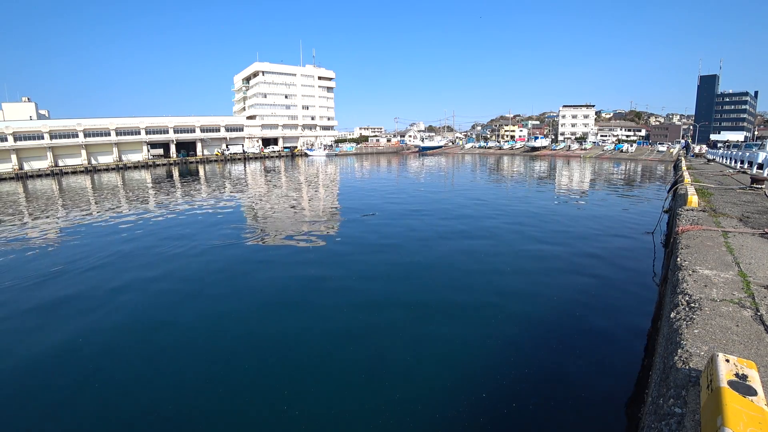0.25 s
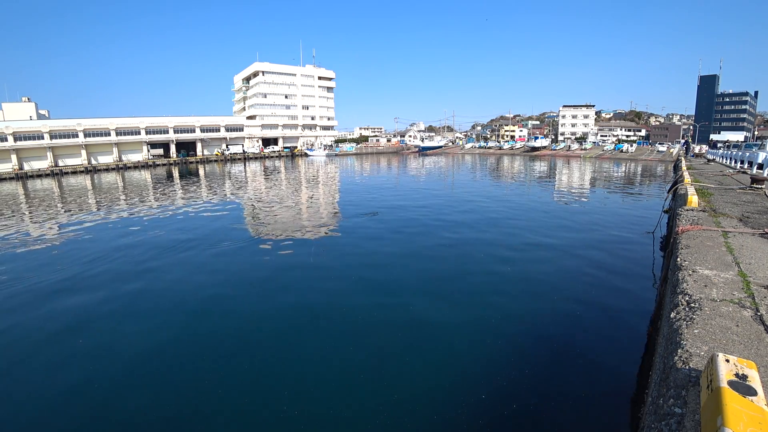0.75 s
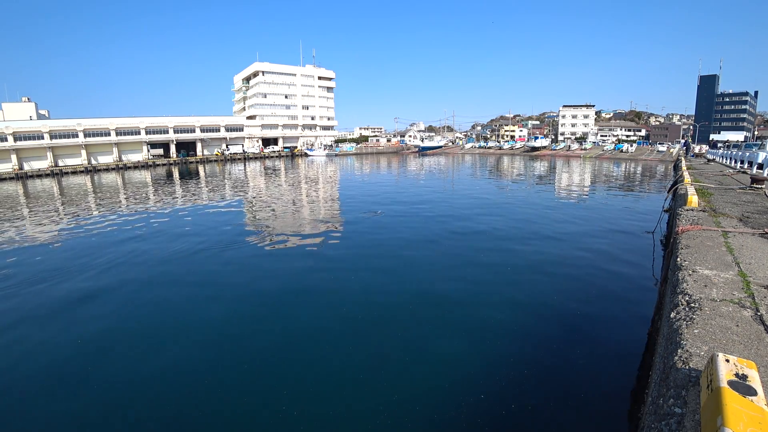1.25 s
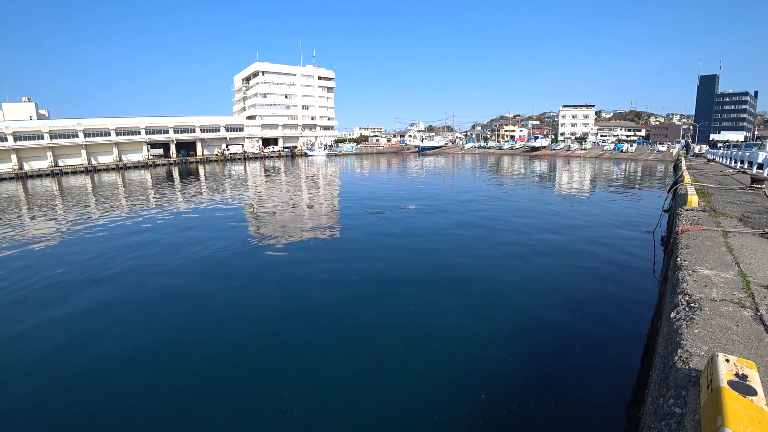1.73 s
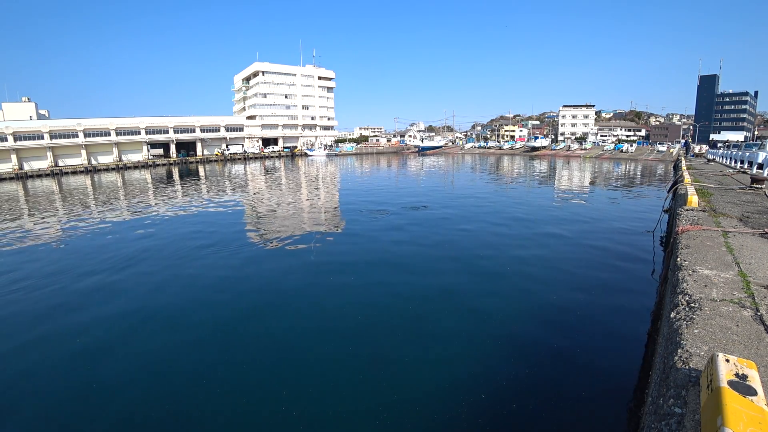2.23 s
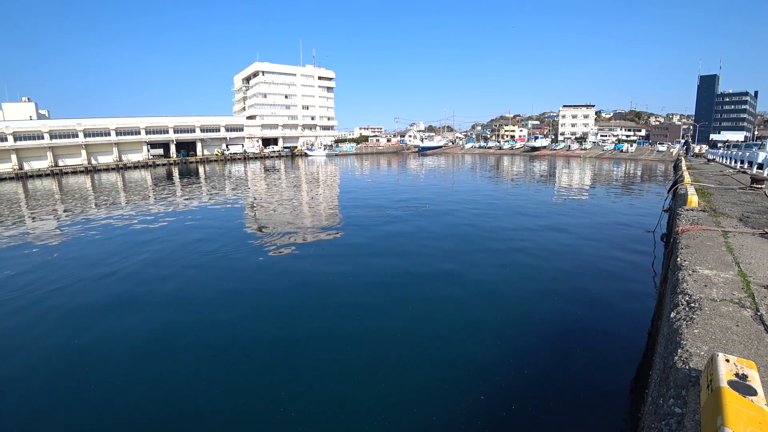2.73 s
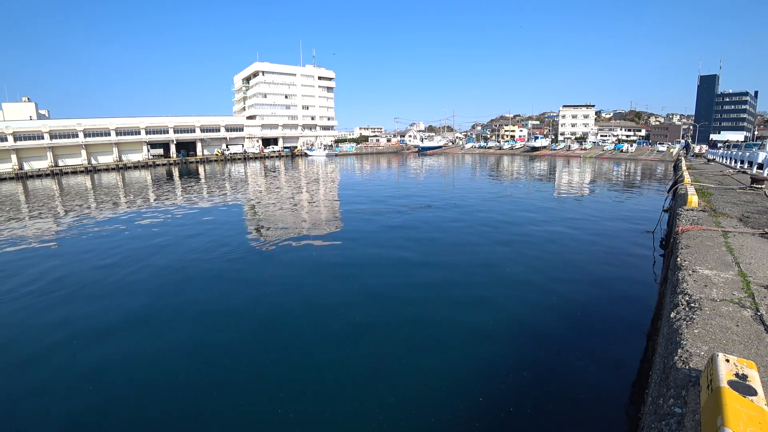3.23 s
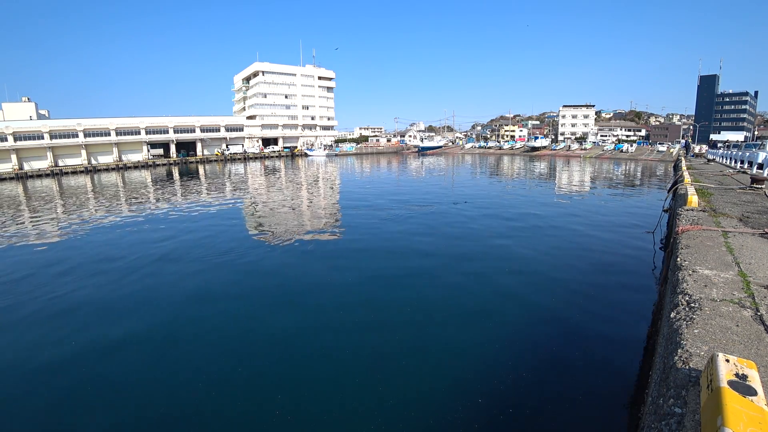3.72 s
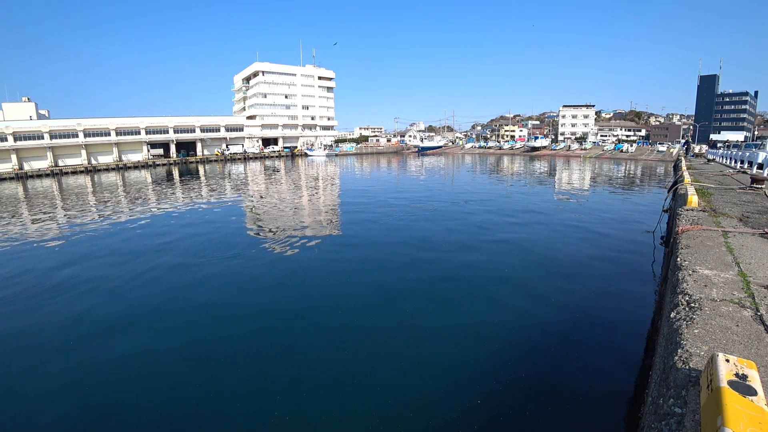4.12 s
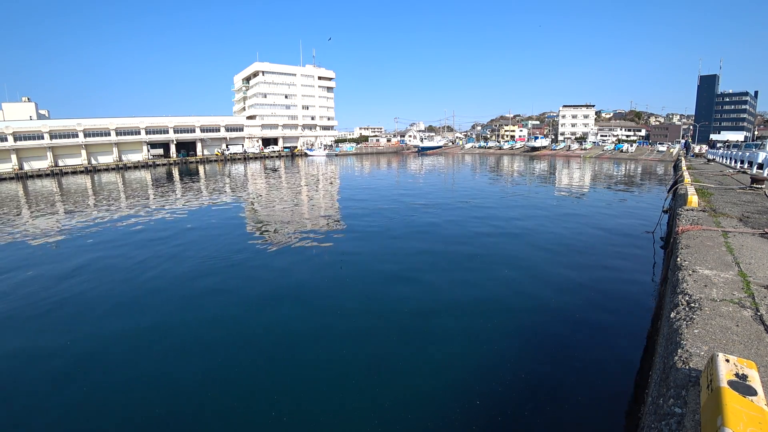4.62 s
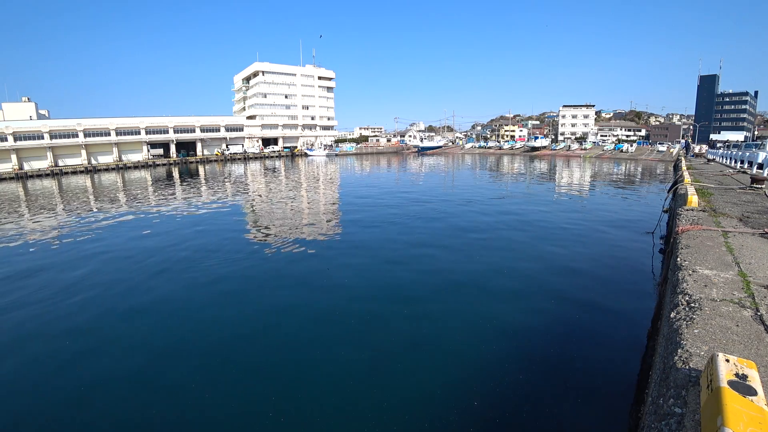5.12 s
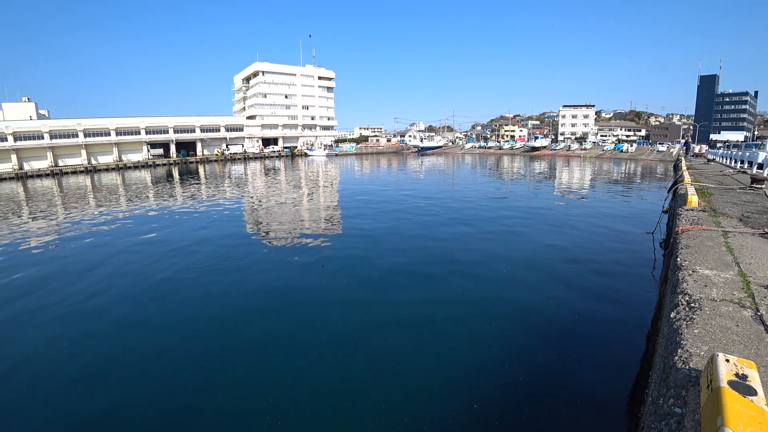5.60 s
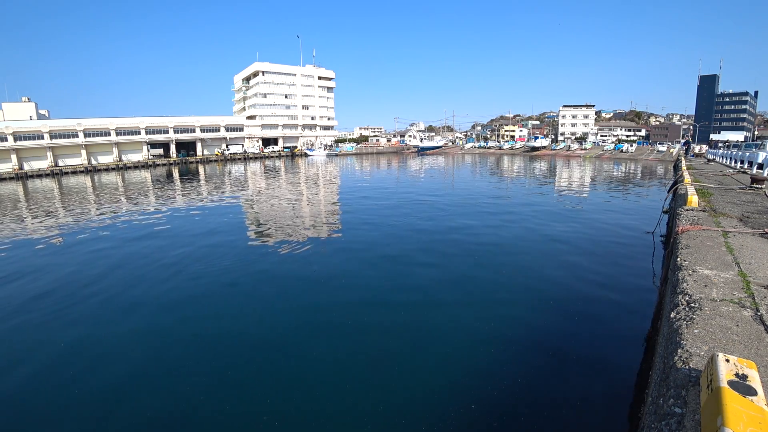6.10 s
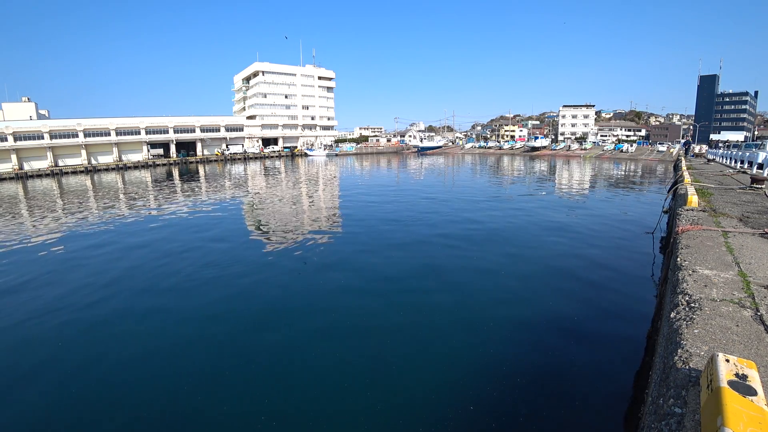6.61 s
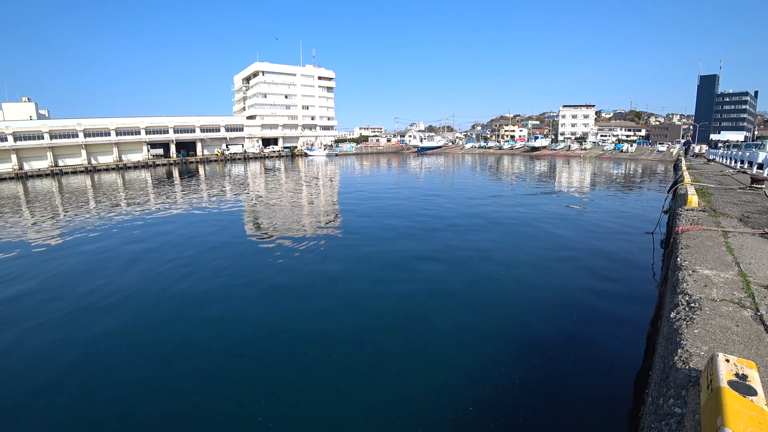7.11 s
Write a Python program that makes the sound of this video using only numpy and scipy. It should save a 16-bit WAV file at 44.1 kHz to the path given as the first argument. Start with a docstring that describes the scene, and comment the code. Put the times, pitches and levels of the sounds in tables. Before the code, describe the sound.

An open, calm harbour heard from the quay for a little over seven seconds. Throughout, a steady low hum of generator and pump, with a faint fan and barely audible thin electric whine, lies under soft, wide distant town and water noise that swells slowly. A small gritty scuff comes at 0.2 s. From 0.4 to 0.7 s a gust buffets the microphone, with a cluster of low fluttering thumps strongest near 0.6 s, uneven between left and right; another bump lands at 1.3 s. From 1.3 to 2 s a shoe scrapes and crunches on grit, close and central. A weaker puff passes around 2.3 s. Short scrapes follow at 3 s, faintly at 3.4 s, and at 4.6 s, with the hum exposed between them. From 6.1 s gritty footsteps return, with a light gust at 6.4 s, then busy crunching and clicking to the end.

```python
"""Calm harbour at the quay. Throughout: far town and water as shaped noise; generator, pump, fan and a thin
electric whine as wavering sine lines. 0.4-1.3 s: gusts, as rumbling noise and decaying pressure kicks, thump on
two microphone ports. From 0.2 s to 2 s, about 3 s and 4.6 s water laps and splashes at the quay: ringing drops,
noise-burst ticks, short sine bubbles. Weaker gusts near 2.3 s and 6.4 s; from 6 s the lapping is busier, to the
end."""
import sys
import numpy as np
from scipy import signal
from scipy.fft import rfft, irfft, next_fast_len
from scipy.io import wavfile
from scipy.ndimage import uniform_filter1d

SR = 44100
rng = np.random.default_rng(int(sys.argv[2]) if len(sys.argv) > 2 else 0)


def makeup_ratio(level_db):
    """Linear amplitude ratio for a level in decibels (20 dB per factor of ten)."""
    decades = np.asarray(level_db, float) / 20
    return 10 ** decades


def waveform_to_disk(signal):
    """Save audio, clipped to [-1, 1], as 16-bit WAV at the path in sys.argv[1]."""
    frames = np.transpose(np.atleast_2d(signal))
    scaled = np.clip(frames, -1, 1) * 32767
    samples = np.round(scaled).astype(np.int16)
    wavfile.write(sys.argv[1], SR, samples)


N = 324135


def columns(table):
    """Table rows as float columns."""
    return np.array(table, float).T


def level(x, rms_db):
    """Scale to an rms level."""
    return x * makeup_ratio(rms_db) / np.sqrt(np.mean(x ** 2))


def shape(table, hz):
    """Spectrum table in dB at given frequencies, interpolated over log frequency."""
    f, db = columns(table)
    return np.interp(np.log(np.maximum(hz, 1)), np.log(f), db)


def colour(x, db_of_hz):
    """Filter by a dB-over-frequency function."""
    n = next_fast_len(x.shape[-1])
    gain = makeup_ratio(db_of_hz(np.fft.rfftfreq(n, 1 / SR)))
    return irfft(rfft(x, n) * gain, n)[..., :x.shape[-1]]


def band_noise(low_hz, high_hz):
    """White noise through a band-pass."""
    sos = signal.butter(2, [low_hz, high_hz], "band", fs=SR, output="sos")
    return signal.sosfilt(sos, rng.standard_normal(N))


def walk(rate_hz):
    """Random levels held 1 / rate_hz and slewed twice; spread near 1."""
    k = int(SR / rate_hz)
    steps = np.repeat(rng.standard_normal(N // k + 1), k)
    return 1.12 * uniform_filter1d(uniform_filter1d(steps, k), k)[:N]


def swell(peak_s, db, rise_s, fall_s):
    """Gain climbing to a peak and dying away, straight in dB: 20 dB per rise_s or fall_s."""
    t = np.arange(N) / SR - peak_s
    return makeup_ratio(db + 20 * np.where(t < 0, t / rise_s, -t / fall_s))


def scatter(rate_per_s, gain, over_db, spread_db, floor_db):
    """Chance events (s, dB, spare chance), strength following a gain curve; the faintest are dropped."""
    count = int(rate_per_s * N / SR)
    when, chance = rng.random(count), rng.standard_normal((count, 2))
    s = (np.arange(count) + when) / rate_per_s
    local_db = 20 * np.log10(gain[(s * SR).astype(int)] + 1e-9)
    db = local_db + over_db + spread_db * chance[:, 0]
    return [row for row in zip(s, db, chance[:, 1]) if row[1] > floor_db]


def add(out, s, sound):
    """Mix a short sound in at a time."""
    i = max(int(s * SR), 0)
    out[..., i:i + sound.shape[-1]] += sound[..., :N - i]


def stereo(mid, side):
    """Left and right from mid and side."""
    return np.array([mid + side, mid - side])


# town and far water plus microphone hiss, relative density: f/Hz, density/(dB per Hz)
FAR_SPECTRUM = [(15, -10), (30, -2), (60, 0), (110, -5), (170, -7.5), (240, -9), (380, -13), (600, -17.5),
                (1200, -23), (2400, -35), (4500, -41), (6800, -45.5), (9300, -49), (10300, -48),
                (11200, -46), (12000, -41.5), (13200, -49.5), (15800, -51)]
# width of that noise: f/Hz, side minus mid/dB
FAR_WIDTH = [(60, -48), (200, -24), (380, -13.5), (700, -8), (1290, -4.5), (2380, -0.5), (8120, -4),
             (12000, -4.5), (15000, -8)]
FAR_MID_RMS_DB = -41.5


def far():
    """Smooth distant noise that swells slowly, wider towards the treble."""
    mid, side = rng.standard_normal((2, N)) * makeup_ratio(1.4 * walk(0.36) + .5 * walk(6))
    mid = colour(mid, lambda hz: shape(FAR_SPECTRUM, hz))
    side = colour(side, lambda hz: shape(FAR_SPECTRUM, hz) + shape(FAR_WIDTH, hz))
    return makeup_ratio(FAR_MID_RMS_DB) / np.std(mid) * stereo(mid, side)


def machine(turn_hz, orders, waver_db, drift_rad, waver_hz=3):
    """Sine lines on multiples of a steady turning rate, each wavering in level."""
    t = np.arange(N) / SR
    turns = turn_hz * t + drift_rad * walk(0.68) / (2 * np.pi)
    lines = 0
    for k, db in orders:
        line = np.sin(2 * np.pi * (k * turns + rng.random()))
        lines = lines + makeup_ratio(db + waver_db * walk(waver_hz)) * line
    return np.sqrt(2) * lines


# lines of each machine before waver: multiple of turning rate, mid rms level/dB
GENERATOR_LINES = [(2, -67.0), (3, -62.0), (6, -39.0), (8, -59.0), (9, -62.0), (10, -57.0), (12, -37.0),
                   (13, -62.0), (14, -59.0), (16, -66.0), (18, -66.0), (22, -68.0), (23, -64.0),
                   (24, -66.0), (28, -67.0), (30, -64.0), (32, -69.0), (34, -64.0), (38, -62.0),
                   (39, -70.0), (40, -72.0), (42, -74.0), (44, -75.0), (47, -74.0), (48, -68.0)]  # diesel generator
PUMP_LINES = [(1, -51), (2, -47), (3, -54.5)]
FAN_LINES = [(28, -76.0), (29, -71.0), (30, -64.0), (31, -75.0), (32, -76.0), (33, -67.0), (35, -77.0),
             (57, -80.0), (60, -84.0), (63, -77.0), (65, -82.0)]
WHINE_LINES = [(151, -97.0), (152, -99.0), (154, -100.0), (155, -100.0), (165, -89.0), (166, -89.0),
               (167, -96.0), (206, -93.0), (207, -95.0), (208, -96.0)]  # thin electric whine
GENERATOR_HZ, PUMP_HZ, FAN_HZ, WHINE_HZ = 9.967, 24.27, 25.022, 59.94


def machines():
    """Harmonic lines of rotating machines and a whine: low hum alike in both ports, high lines differing."""
    generator = machine(GENERATOR_HZ, GENERATOR_LINES, waver_db=.6, drift_rad=.02)
    pump = machine(PUMP_HZ, PUMP_LINES, waver_db=1.5, drift_rad=.2)
    fan = machine(FAN_HZ, FAN_LINES, waver_db=3, drift_rad=.015, waver_hz=12)
    whine = machine(WHINE_HZ, WHINE_LINES, waver_db=.8, drift_rad=.001)
    side = .15 * np.roll(fan, 15) + .9 * np.roll(whine, 1)
    return stereo(generator + pump + fan + whine, side)


def eddy(db, hz, phase_rad, rise_turns=0.4, fall_turns=0.33):
    """A sudden pressure kick, zero on balance, that swings back and dies within two turns."""
    turns = np.arange(0, 5, hz / SR)
    envelope = (1 - np.exp(-(turns / rise_turns) ** 2)) * np.exp(-turns / fall_turns)
    kick = envelope / envelope.max() * np.cos(2 * np.pi * turns + phase_rad)
    return makeup_ratio(db) * (kick - envelope * kick.sum() / envelope.sum())


# gusts over the ports: peak t/s, gain level/dB, 20 dB rise/s, 20 dB fall/s
GUST_SWELLS = [(.38, -58, .2, .15), (.5, -36, .06, .15), (.62, -29, .15, .1), (.78, -49, .15, .07),
               (.92, -56, .08, .1), (1.07, -49, .2, .14), (1.29, -43, .14, .14), (2.22, -49, .05, .3),
               (2.45, -49, .25, .1), (3.13, -61, .12, .25), (4.17, -62, .2, .12), (6.41, -45, .17, .11),
               (6.68, -63, .2, .2)]
# strongest eddies on the ports: t/s, nominal side peak level/dB, size as centre f/Hz
STRONG_EDDIES = [(0.4877, -10.5, 280), (0.571, -18, 156), (.584, -19, 196), (.600, -16.5, 330),
                 (.606, -15, 176), (0.6126, -13.5, 383), (0.6177, -13, 400), (0.623, -6, 410),
                 (0.629, -18, 191), (0.669, -21, 190), (1.099, -27, 142), (1.079, -33, 111),
                 (1.2927, -13.5, 230), (1.31, -26, 171), (2.351, -21.5, 210), (6.404, -28, 127)]
BREEZE_GAIN_DB = -78  # air that never quite rests
EDDY_TRIES_PER_S, EDDY_OVER_GUST_DB = 35, 9
EDDY_HZ_AT_MINUS_35_DB, EDDY_DB_PER_OCTAVE = 130, 22  # stronger is higher


def wind():
    """Turbulent rumble riding the gusts, deep in mid and higher between the ports, plus eddies."""
    air = makeup_ratio(BREEZE_GAIN_DB) + sum(swell(*row) for row in GUST_SWELLS)
    gust = air * makeup_ratio(1.96 * walk(30))
    deep, across = band_noise(18, 110), band_noise(55, 190)
    out = stereo(gust * level(deep, 3.3), gust * level(across, 0))
    eddies = list(STRONG_EDDIES)
    for s, db, chance in scatter(EDDY_TRIES_PER_S, air, EDDY_OVER_GUST_DB, spread_db=3.5, floor_db=-65):
        octaves = (db + 35) / EDDY_DB_PER_OCTAVE + .2 * chance
        eddies.append((s, db, EDDY_HZ_AT_MINUS_35_DB * 2 ** octaves))
    for (s, db, hz), chance in zip(eddies, rng.standard_normal((len(eddies), 2))):
        # pulls one port as it pushes the other; the shared part is weaker and slower
        side = eddy(db, hz, 1.0 + .3 * chance[0])
        mid = eddy(db - 8, .75 * hz, 1.6 + .4 * chance[1])
        push = eddy(db - 18, 0.16 * hz, 3.55)  # slow surge of air with it
        add(out, s - 0.28 / hz, stereo(0 * side, side))
        add(out, s - 0.8 / hz, stereo(mid, 0 * mid))
        add(out, s - 1.8 / hz, stereo(push, -.55 * push))
    return out


# spectrum of the splashing water, relative density: f/Hz, density/(dB per Hz)
SPLASH_SPECTRUM = [(350, -31), (600, -1), (1480, -5), (1600, -7), (2380, -8), (2690, -12), (4110, -8),
                   (5550, -14), (6800, -13), (9060, -23), (10800, -22), (15600, -37)]
# splashes of water lapping at the quay: peak t/s, gain level/dB, 20 dB rise/s, 20 dB fall/s, brightness/dB
# (before the shares below)
SPLASH_SWELLS = [(.235, -58, .15, .03, 5), (.262, -55, .006, .14, -2), (1.312, -53, .02, .14, 4),
                 (1.43, -49, .09, .09, 1), (1.5, -66, .1, .3, 2), (1.662, -47, .012, .2, 1),
                 (1.81, -61, .04, .4, -2), (1.985, -60, .01, .07, 3), (2.92, -61, .07, .08, 7),
                 (3.0, -47, .06, .035, 4), (3.388, -56, .012, .04, 6), (4.51, -64, .02, .12, 4),
                 (4.55, -64, .06, .05, 10), (4.627, -54, .05, .05, -2), (6.108, -53, .012, .03, 8),
                 (6.49, -62, .12, .3, -2), (6.592, -50, .08, .1, 0), (6.68, -52, .04, .12, 1),
                 (6.738, -50, .04, .1, -2), (6.87, -54, .15, .15, 3), (6.935, -52, .05, .08, -2),
                 (7.054, -50, .14, .1, 1), (7.19, -54, .15, .12, -4), (7.26, -54, .06, .3, -3)]
DEEP_SHARE, BRIGHT_SHARE = .9, .9  # how far brightness thins the deep end, lifts the bright end


def spatter(swells, drops_per_s=150, spread_db=3.3, fizz=.75, flicker_db=2.2, ring_q=9):
    """Drops of uneven size, each ringing a few cycles at its band's pitch, over fizz."""
    brightness_db = columns(SPLASH_SWELLS)[4]
    out, shared = 0, walk(66)
    for hz in 560 * 2 ** np.arange(0, 4.8, .16):
        size = makeup_ratio(spread_db * np.minimum(rng.exponential(size=N), 3))
        drops = (rng.random(N) < drops_per_s / SR) * rng.standard_normal(N) * size
        splashing = level(drops, 0) + fizz * rng.standard_normal(N)
        edges_hz = hz * (1 + np.array([-.5, .5]) / ring_q)
        ring = signal.sosfilt(signal.butter(2, edges_hz, "band", fs=SR, output="sos"), splashing)
        bright = BRIGHT_SHARE * np.clip(np.log2(hz / 5000), 0, 1)
        deep = DEEP_SHARE * np.clip(np.log2(3200 / hz), 0, 1)
        splash_gain = makeup_ratio((bright - deep) * brightness_db) @ swells
        band_db = shape(SPLASH_SPECTRUM, hz) + 10 * np.log10(hz / 4000)  # band width grows with hz
        flicker = flicker_db * (shared + walk(40))
        out = out + level(ring, 0) * makeup_ratio(band_db + flicker) * splash_gain
    return out


def click(db, hz, t60_s=0.01, tilt_db=9):
    """A drop's tick of a few milliseconds: decaying noise, strongest about its centre."""
    t = np.arange(512) / SR
    burst = rng.standard_normal(512) * np.exp(-np.log(1000) * t / t60_s)

    def click_db(f):
        octaves = np.log2(np.maximum(f, 50) / hz)
        return .5 * shape(SPLASH_SPECTRUM, np.maximum(f, 2500)) - tilt_db * octaves ** 2

    burst = colour(burst, click_db)
    return makeup_ratio(db) * burst / np.abs(burst).max()


def blip(db, hz, cycles, glide=0.02):
    """A short bubble in the splashing: a decaying sine of a few cycles, rising slightly in pitch."""
    turns = np.arange(int(3 * cycles / hz * SR)) * hz / SR
    envelope = (1 - np.exp(-turns / 0.29)) * np.exp(-2.2 * turns / cycles)
    tone = np.sin(2 * np.pi * turns * (1 + glide * turns / cycles))
    return makeup_ratio(db) * envelope / envelope.max() * tone


# clearest ticks of the splashing water: t/s, mid peak level/dB, centre f/Hz
CLEAR_CLICKS = [(0.1538, -43, 4510), (0.2298, -36.5, 4630), (0.26, -34, 4000), (0.9163, -46, 7150),
                (1.3025, -41, 6860), (1.3142, -38.5, 6860), (1.3922, -38, 3600), (1.425, -35, 3600),
                (1.704, -35, 3800), (1.7733, -40, 7000), (1.8108, -41, 4500), (1.838, -42, 3600),
                (1.8911, -40, 3860), (1.9807, -43, 3580), (2.8809, -46, 4000), (2.8898, -40.5, 3630),
                (2.9376, -44, 7000), (2.9995, -31, 3600), (3.298, -46, 4300), (3.3842, -35, 4320),
                (3.3977, -39, 5000), (4.5446, -42, 6120), (4.5531, -44, 7500), (4.561, -40, 8640),
                (4.625, -37, 3300), (6.0624, -46, 7240), (6.0854, -36, 6410), (6.543, -35.5, 3990),
                (6.589, -31, 5830), (6.6468, -44, 5000), (6.679, -34.5, 6770), (7.142, -42, 4130),
                (7.1995, -39, 4090)]
# clearest bubbles in the splashing: t/s, mid envelope peak level/dB, starting f/Hz, ring length/cycles
CLEAR_BUBBLES = [(.262, -42, 2900, 8), (.333, -48, 3750, 11), (1.431, -36, 2220, 8.8), (1.433, -34, 700, 8.3),
                 (1.661, -34, 2480, 6.9), (1.705, -34, 1360, 6), (1.736, -37, 1270, 6.6),
                 (1.777, -38, 1880, 12), (1.800, -40, 856, 19), (1.815, -33, 830, 8),
                 (1.872, -35.5, 1300, 12), (1.920, -43, 3280, 12), (2.965, -39, 3070, 9),
                 (2.9995, -28, 3300, 5), (4.609, -37, 600, 4), (4.623, -35, 850, 9.2),
                 (4.649, -41.5, 1850, 10), (6.088, -39, 2040, 15), (6.577, -37, 2290, 10),
                 (6.594, -36, 2340, 17), (6.69, -40, 6900, 20), (6.735, -39, 4000, 10),
                 (6.821, -40, 3730, 14), (6.961, -38.5, 620, 7.1), (7.06, -33.5, 1070, 5.5),
                 (7.255, -44, 6700, 20), (7.313, -42, 4300, 10)]
CLICK_TRIES_PER_S, CLICK_OVER_SPLASH_DB, SMALL_CLICK_HZ = 45, 10, 4300


def water():
    """Water lapping at the quay, nearly centred, with a faint slap back from the quay wall."""
    swells = np.array([swell(*row[:4]) for row in SPLASH_SWELLS])
    mid = spatter(swells)
    clicks = list(CLEAR_CLICKS)
    splash = swells.sum(axis=0)
    for s, db, chance in scatter(CLICK_TRIES_PER_S, splash, CLICK_OVER_SPLASH_DB, spread_db=3.5, floor_db=-60):
        clicks.append((s, db, SMALL_CLICK_HZ * 2 ** (.4 * chance)))
    for s, db, hz in clicks:
        add(mid, s, click(db, hz))
    for s, db, hz, cycles in CLEAR_BUBBLES:
        add(mid, s, blip(db, hz, cycles))
    t = np.arange(2048) / SR
    wall = rng.standard_normal(2048) * np.exp(-np.log(1000) * t / .04)  # T60 40 ms
    echo = signal.fftconvolve(mid, wall / np.linalg.norm(wall))[:N]
    return stereo(mid, makeup_ratio(-16) * echo - 0.036 * mid)


def scene():
    """Distance, machines, wind and water at the two ports."""
    return far() + machines() + wind() + water()


def low_pass(x):
    """Removes everything above the highest recorded frequency."""
    return signal.sosfilt(signal.butter(12, 15790, fs=SR, output="sos"), x)


def record(dry):
    """The finished mix as heard."""
    return low_pass(dry)


dry = scene()
out = record(dry)
waveform_to_disk(out)
```